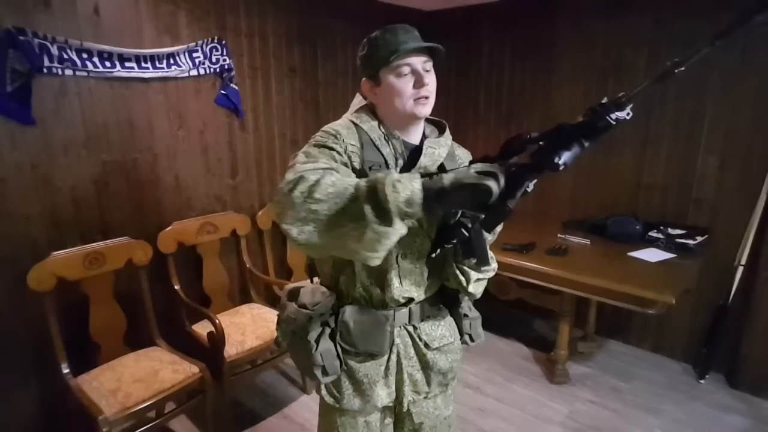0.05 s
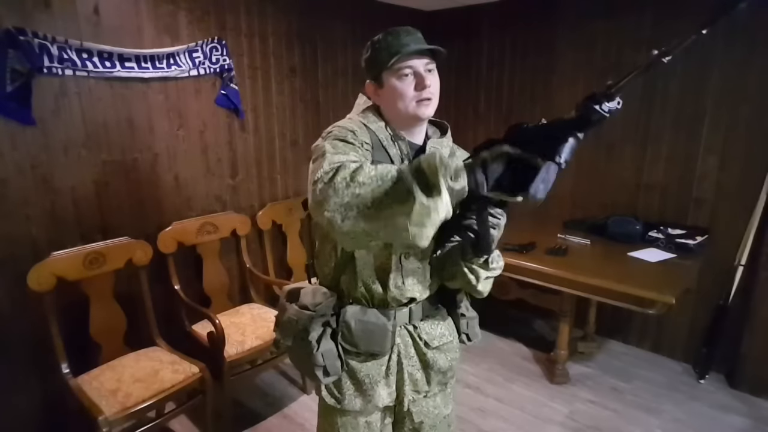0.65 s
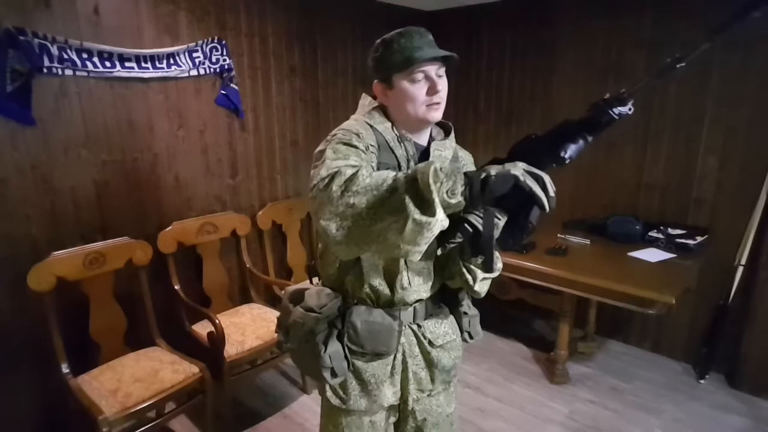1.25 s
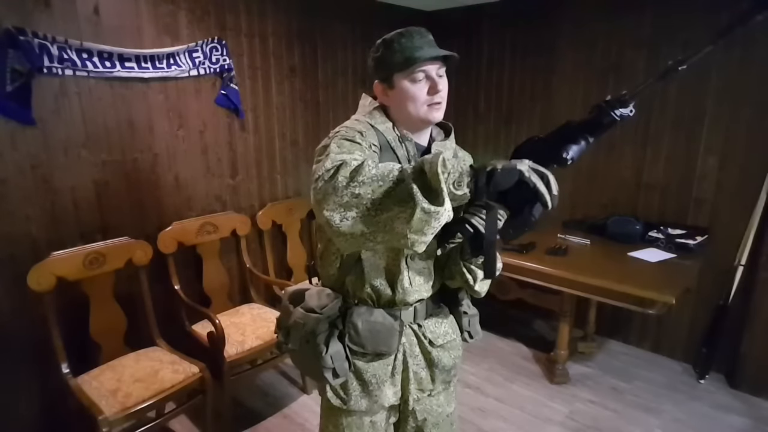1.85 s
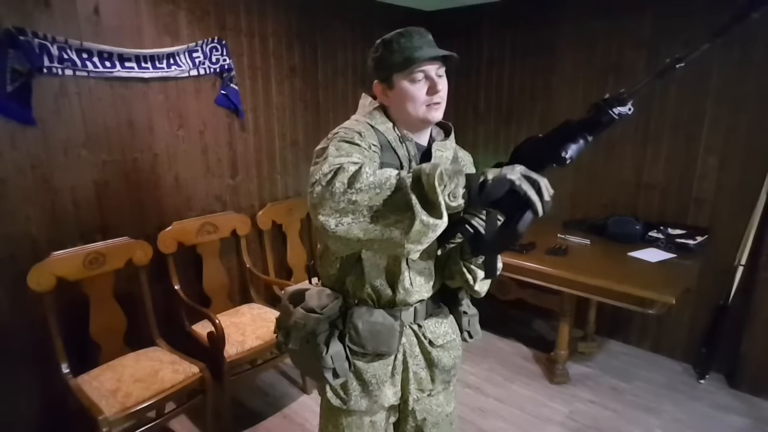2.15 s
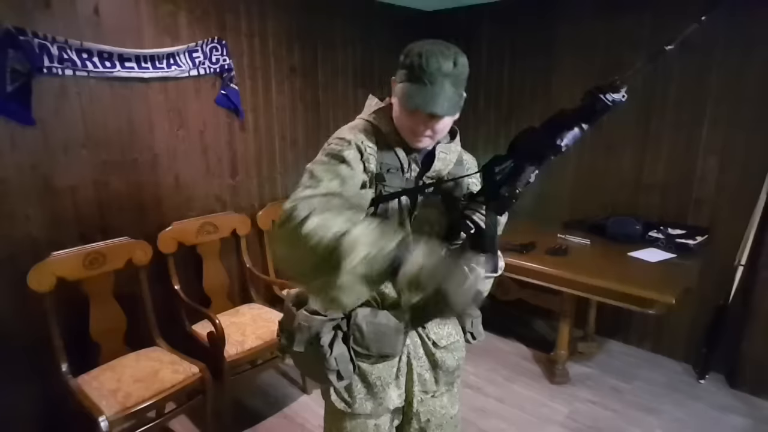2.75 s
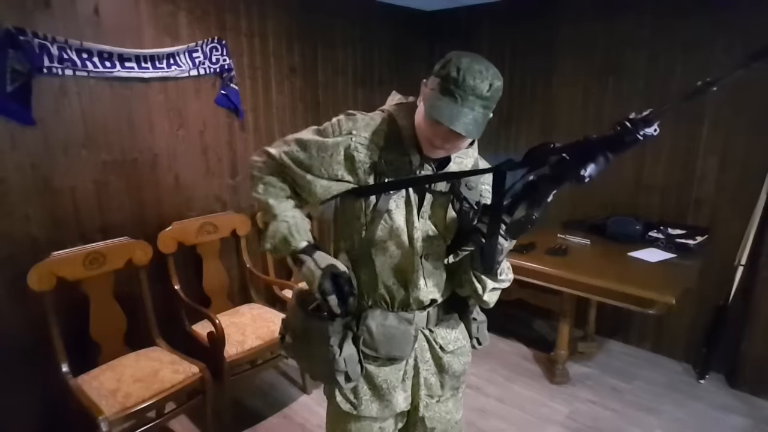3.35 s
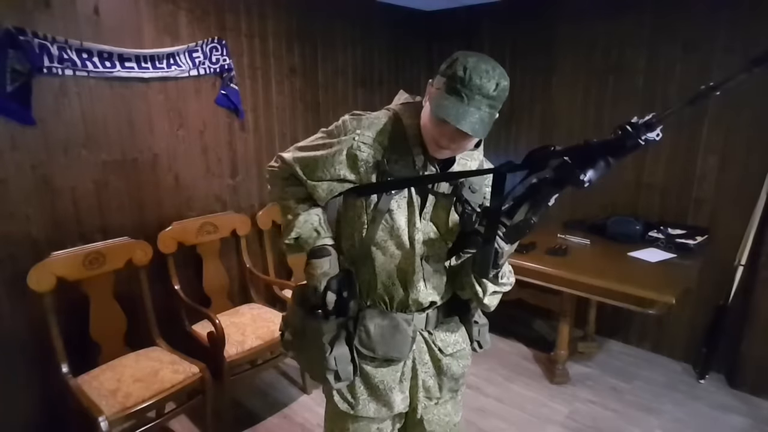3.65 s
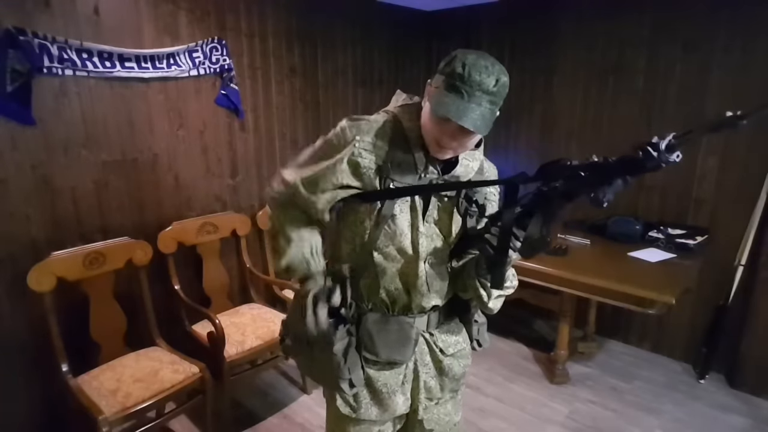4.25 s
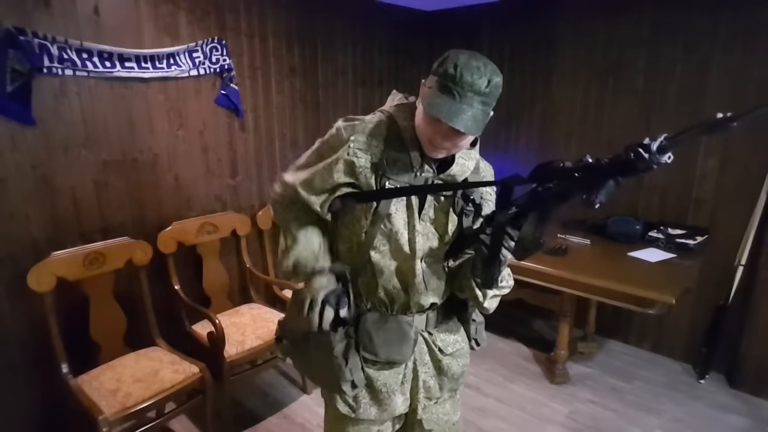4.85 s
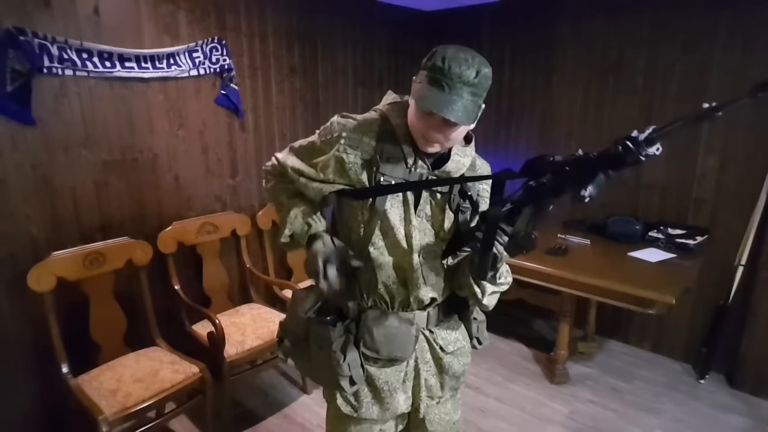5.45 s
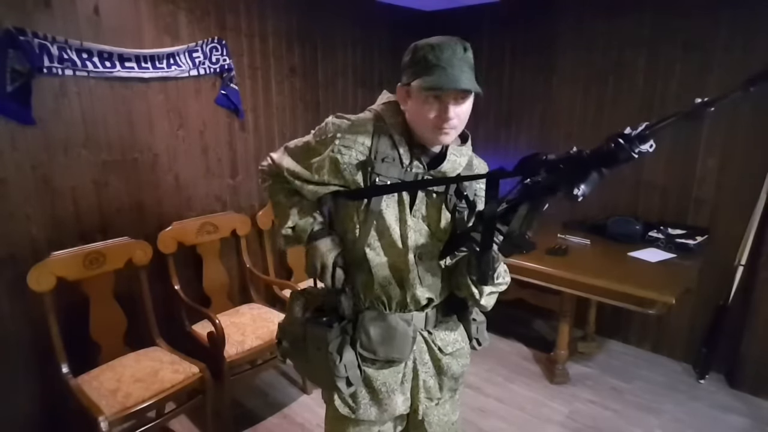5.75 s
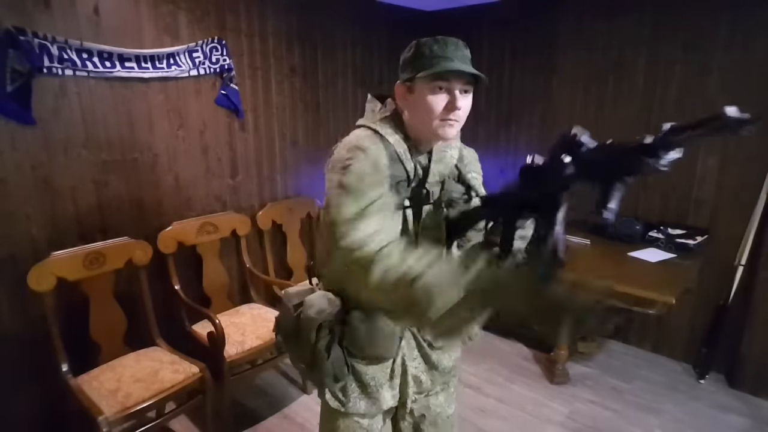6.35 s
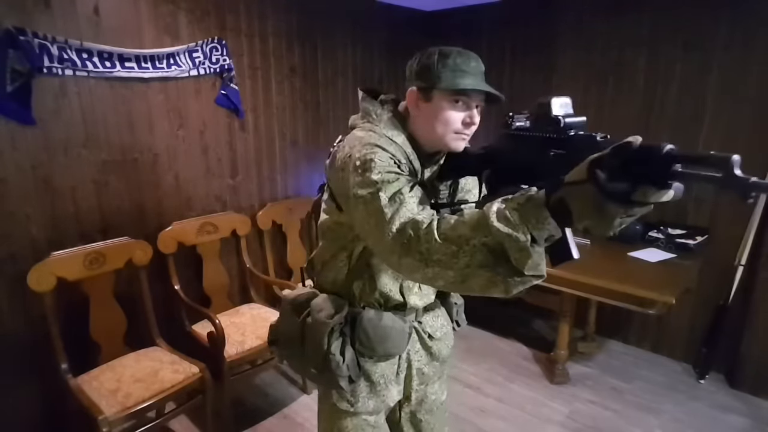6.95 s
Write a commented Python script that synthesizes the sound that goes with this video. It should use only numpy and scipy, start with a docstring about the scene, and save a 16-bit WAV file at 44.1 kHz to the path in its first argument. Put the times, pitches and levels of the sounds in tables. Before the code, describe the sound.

A rifle is handled in a small wood-panelled room, heard in stereo with short, lively reflections over faint air and a barely audible hum. Soft sleeve rustle and small steel clicks open, leading to a loud, hollow plastic magazine clack at about 0.75 seconds. Light taps follow. Sharp, briefly ringing steel snaps come at 1.9 and 2.4 seconds, with plastic knocks between them, then a quick clatter and a swish of cloth at 2.7. From about 3 to 5.8 seconds a gloved hand rummages in a fabric pouch: quieter, uneven rubbing and crinkling with dull, padded bumps, the strongest near 5 seconds with a soft low thud. A firm plastic knock lands at 6.2 seconds. The stock scrapes briefly up the jacket, rising into another clack at 6.5. A small click, a knock and a last rustle settle by about 6.8 seconds.

```python
"""A small, live, wood-panelled room, heard from two microphones 16 cm apart.
Someone in stiff field clothes handles a rifle: sleeves rub, steel catches snap and a hollow plastic
magazine knocks home. A gloved hand rummages in a fabric pouch, where the gear bumps dully; then the
stock scrapes up the jacket to the shoulder. Blows ring the parts they strike, fibres catch and slip,
and the walls send both back to the microphones over still air and a faint hum."""
import sys
import numpy as np
from scipy import signal
from scipy.fft import rfft, irfft, next_fast_len
from scipy.io import wavfile
from scipy.ndimage import map_coordinates

SR = 44100
rng = np.random.default_rng(int(sys.argv[2]) if len(sys.argv) > 2 else 0)


def store_wav(level_fs):
    """Save 16-bit WAV to argv[1]."""
    pcm = np.round(np.clip(np.atleast_2d(level_fs), -1, 1) * 32767)
    wavfile.write(sys.argv[1], SR, pcm.T.astype(np.int16))


N = 313501
TIME = np.arange(N) / SR


def amp(db):
    """Decibels to gain."""
    return 10 ** (np.asarray(db) / 20)


def unit(x):
    """Scaled to rms 1."""
    return x / np.sqrt(np.mean(x ** 2) + 1e-20)


def along(points, hz):
    """(Hz, value) points read on a log axis."""
    f, v = np.transpose(points)
    return np.interp(np.log(hz + 1), np.log(f + 1), v)


def spectrum(points):
    """(Hz, dB) points as a gain curve over frequency."""
    return lambda hz: amp(along(points, hz))


def resonance(modes, hz):
    """Power gain of a set of resonances."""
    return sum(amp(db) ** 2 / (1 + (2 * (hz - centre) / width) ** 2) for centre, width, db in modes)


def filtered(x, response):
    """x through a response of frequency."""
    n = x.shape[-1]
    m = next_fast_len(n + 8192)
    return irfft(rfft(x, m) * response(np.fft.rfftfreq(m, 1 / SR)), m)[..., :n]


def coloured(x, gain):
    """x through the causal filter that has this gain: it rings only after the blow."""
    m = 2 ** 14
    cepstrum = irfft(np.log(gain(np.fft.rfftfreq(m, 1 / SR)) + 1e-6))
    cepstrum[1:m // 2] *= 2
    cepstrum[m // 2 + 1:] = 0
    return signal.fftconvolve(x, irfft(np.exp(rfft(cepstrum))))[:len(x)]


def add(track, s, sound):
    """Mix a sound in at s seconds."""
    start = max(0, round(s * SR))
    part = track[..., start:start + sound.shape[-1]]
    part += sound[..., :part.shape[-1]]


def lean_right(pair, db):
    """The right microphone up by db, the left down by as much."""
    return pair * amp([[-db], [db]])


def diffuse(size, spacing_m=0.16):
    """Noise from all sides at the two microphones: alike in the bass only."""
    def mid_side_gains(hz):
        angle = np.arccos(0.9 * np.sinc(2 * hz * spacing_m / 343)) / 2
        return np.array([np.cos(angle), np.sin(angle)])
    mid, side = filtered(rng.standard_normal((2, size)), mid_side_gains)
    return np.array([mid + side, mid - side])


# How long the panelled room rings. Each row: frequency in Hz, seconds to fall 60 dB.
ROOM_T60 = [(150, 0.38), (400, 0.49), (1100, 0.89), (2700, 0.72), (7000, 0.63), (14000, 0.32)]
# Where the hands work. Each row: time in seconds, lead of the left microphone in ms.
HAND_POSITION = [(0, 0.13), (2.6, 0.12), (3.1, -0.04), (6.2, -0.02), (6.5, 0.096)]

def in_room(direct, radiated, s, early_db, tail_db, early_t60, build_s):
    """Direct sound reaches the nearer microphone first; what is radiated all round returns off walls."""
    t = np.arange(SR * 3 // 4) / SR
    hz, frame_s, bands = signal.stft(diffuse(len(t)), SR, nperseg=256)
    decay = amp(-60 * frame_s / along(ROOM_T60, hz)[:, None])
    tail = signal.istft(bands * decay, SR, nperseg=256)[1][:, :len(t)]
    early = diffuse(len(t)) * amp(-60 * t / early_t60)
    arriving = lambda echoes: unit(echoes * (1 - np.exp(-t / build_s))) / np.sqrt(len(t))
    walls = amp(early_db) * arriving(early) + amp(tail_db) * arriving(tail)
    pair = signal.fftconvolve(radiated[None], walls, axes=1)
    lead_s = np.interp(s, *np.transpose(HAND_POSITION)) / 1000
    add(pair, 0, filtered(direct, lambda hz: np.exp(1j * np.pi * hz * lead_s * np.array([[1], [-1]]))))
    return pair


def moving_in_room(sound):
    """The body moves, so each third of a second meets the room differently."""
    out, step = np.zeros((2, N)), SR // 3
    for start in range(0, N, step):
        piece, s = sound[start:start + step], start / SR
        add(out, s, in_room(piece, piece, s, early_db=3, tail_db=0, early_t60=0.099, build_s=0.0049))
    return lean_right(out, 0.99)


# The empty room, all round the microphones. Each row: frequency in Hz, relative density in dB.
AIR_SPECTRUM = [(25, -28), (48, -8), (64, -2), (112, -4), (180, -8.5), (320, -4), (700, -5), (2000, -11),
                (4000, -16), (9000, -26), (16000, -21.5)]

def room_tone():
    """Still air from all sides and a faint low hum, alike at both microphones."""
    air = unit(filtered(diffuse(N), spectrum(AIR_SPECTRUM)))
    hum = np.sin(2 * np.pi * 49 * TIME)
    return amp(-64.5) * air + amp(-76) * hum


def friction(gain, slips_per_s, spread_db, hiss):
    """Fibres catch and slip: grains of uneven size over a smooth hiss; rms 1."""
    slipping = rng.random(N) < slips_per_s / SR
    sizes = amp(spread_db * np.minimum(rng.exponential(size=N), 3.5))
    pressure = signal.lfilter([1], [1, -np.exp(-1 / (0.0024 * SR))], slipping * sizes)
    return unit(coloured(rng.standard_normal(N) * (unit(pressure) + hiss), gain))


def stroke(start, length, attack_s=0.034, release_s=0.034):
    """One movement: cloth takes up the motion, holds it, then settles."""
    rise = np.clip(1 + (TIME - start) / attack_s, 0, 1)
    return rise * np.exp(-np.clip((TIME - start - length) / release_s, 0, 20))


def fumble(depth_db=2.5, per_s=14):
    """The hand never moves evenly: a smooth random gain for its hesitations."""
    wobble = map_coordinates(rng.standard_normal(512), [TIME * per_s], mode="wrap")
    return unit(amp(depth_db * wobble))


# Stiff cloth's low, middle and high voices. Each row: frequency in Hz, relative density in dB.
FLAP_SPECTRUM = [(100, -6.5), (200, -12.5), (320, -1.5), (600, -0.5), (900, -7), (1800, -42.5)]
RUB_SPECTRUM = [(350, -30), (750, -5), (1300, -1), (2300, -2.5), (3200, -6.5), (6000, -23)]
CRINKLE_SPECTRUM = [(1600, -45), (3200, -2.5), (5000, -5), (7800, -4), (9500, -11), (12000, -8),
                    (16000, -9)]
# Sleeve and glove moves. Each row: start in seconds, length in seconds, effort in dB, crispness in dB.
CLOTH_STROKES = [(0.0, 0.052, -63, -10), (0.2, 0.076, -69.5, -1), (0.377, 0.64, -58, -13),
                 (1.147, 0.3, -76, -16), (2.637, .07, -49.5, -25), (2.719, 0.056, -46, -6),
                 (3.178, 2.02, -62, -5.5), (3.236, 0.078, -58.5, -4.5), (3.629, 0.075, -53.5, -1),
                 (3.747, 0.098, -59, -3.5), (3.909, 0.066, -54, -2.5), (4.293, 0.049, -50.5, 3.5),
                 (4.672, 0.21, -55, -4), (4.876, 0.13, -47.5, -12), (5.283, 0.12, -61.5, -1.5),
                 (5.608, 0.19, -61.5, -3), (5.895, 0.2, -60, -3), (6.114, 0.13, -49.5, -5),
                 (6.386, 0.24, -56.5, -1.5), (6.676, 0.074, -43, -15)]

def cloth():
    """Sleeves, glove and pouch flap, rub and crinkle with the effort of each stroke."""
    flap = friction(spectrum(FLAP_SPECTRUM), slips_per_s=300, spread_db=-1.5, hiss=0.32)
    rub = friction(spectrum(RUB_SPECTRUM), slips_per_s=400, spread_db=5, hiss=0.32)
    crinkle = friction(spectrum(CRINKLE_SPECTRUM), slips_per_s=230, spread_db=8, hiss=0.55)
    mean_db = np.mean([db for _, _, db, _ in CLOTH_STROKES])
    power = np.zeros((3, N))
    for start, length, db, crisp_db in CLOTH_STROKES:
        flap_db = mean_db - 7 + 0.9 * (db - mean_db)  # grows a little less than the rubbing
        power += np.outer(amp([flap_db, db, db + crisp_db]) ** 2, stroke(start, length) ** 2)
    return np.sum(np.sqrt(power) * [flap, rub, crinkle], axis=0) * fumble()


def tone(weight_db, hardness_db, body_db, body_share, edge_db, edge_share):
    """Band levels in dB: more mass behind a blow gives thud and body, barer parts give edge and tick."""
    return weight_db, body_db + body_share * weight_db, edge_db + edge_share * hardness_db, hardness_db


def contact(bands_db, rattle_t60, modes, bass_db, rise_s, strike):
    """One blow and its quick chatter ring a part. Returns the rattling sound and the bare ring."""
    thud, body, edge, tick = bands_db
    t = np.arange(SR // 5) / SR
    blow = signal.unit_impulse(len(t))
    chatter = rng.laplace(size=len(t)) * amp(-60 * t / max(rattle_t60, 0.004))
    chatter *= 1 - np.exp(-t / rise_s)
    force = chatter / np.linalg.norm(chatter) + strike * np.roll(blow, round(rise_s * SR))
    bass = thud + bass_db
    colour = [(40, bass - 22), (110, bass), (195, bass), (310, thud + 3), (500, thud + 3.86),
              (720, body + 0.79), (1100, body + 2), (1500, -2.36), (2400, -3.37),
              (3400, edge - 3), (6000, edge - 6.5), (9200, tick - 9), (14000, tick - 7)]
    blow_samples = SR * 0.02  # a contact's level is its energy spread over 20 ms
    gain = lambda hz: amp(along(colour, hz)) * np.sqrt(blow_samples * (1 + resonance(modes, hz)))
    return coloured(force / np.linalg.norm(force), gain), coloured(blow, gain)


# The steel's resonances. Each row: pitch in Hz, width in Hz, level in dB over the plain contact.
STEEL_MODES = [(1038, 84, 7), (1246, 45, 6), (1450, 90, -21.5), (1730, 70, -16), (2220, 82, 2),
               (3940, 150, -5.5), (4180, 170, 3.5), (7940, 490, 4), (10700, 190, 6.5), (12360, 600, 6.5)]
# Catches and levers. Each row: start in seconds, level, weight and hardness in dB, main ring in Hz.
CATCH_SNAPS = [(0.1024, -41.5, -14.5, -4.5, 2500), (0.3627, -31, -30, -15.5, 1760),
               (0.4405, -35, -13.5, -6, 1760), (0.5308, -40.5, -33, -2.5, 1740),
               (0.6751, -29, -23, 0, 3920), (1.9184, -18, -16.5, -2.5, 1085),
               (2.2142, -36, -15.5, -16.5, 2030), (2.4168, -16.5, -30, -6, 3980),
               (6.6439, -31.5, -29, -1.5, 1060)]

def catch_snaps():
    """Sprung steel parts snap over, each with a ring of its own; light ones stay short and dry."""
    out = np.zeros((2, N))
    strongest_db = max(row[1] for row in CATCH_SNAPS)
    for s, db, weight, hardness, ring_hz in CATCH_SNAPS:
        modes = STEEL_MODES + [(ring_hz, 0.061 * ring_hz, 10)]
        shaken = amp(0.2 * (db - strongest_db))  # a stronger snap shakes more of the rifle
        bands = tone(weight, hardness, body_db=9.5, body_share=1, edge_db=0.85, edge_share=0.38)
        direct, ring = contact(bands, rattle_t60=0.042 * shaken, modes=modes,
                               bass_db=-5.5, rise_s=0.00067, strike=0.36)
        pair = in_room(direct, ring * shaken, s, early_db=2, tail_db=2, early_t60=0.22, build_s=0.0024)
        add(out, s, amp(db) * pair)
    return lean_right(out, 0.93)


# The magazine's resonances. Each row: pitch in Hz, width in Hz, level in dB over the plain contact.
MAGAZINE_MODES = [(328, 8.4, 10.5), (477, 116, 5.5), (638, 71, 6.5), (887.4, 25.6, 10), (1170, 25, 2.5),
                  (1330, 34, -1), (1730, 150, 1.5), (2540, 98, -26)]
# Plastic knocks. Each row: start in seconds, level, weight and hardness in dB, main ring in Hz.
MAGAZINE_KNOCKS = [(0.583, -36.5, -24, -10.5, 1410), (0.7283, -22.5, -14.5, -21, 875),
                   (0.7558, -13, -15, -13.5, 633), (1.1487, -47, -0.5, -14, 265),
                   (1.2231, -44.5, 0, -15, 310), (1.3502, -38.5, -12, -27, 786),
                   (1.6195, -53.5, -18, -23, 1880), (1.7167, -52.5, -22, -23.5, 1880),
                   (1.7694, -47.5, 3, -10.5, 314), (2.0718, -29.5, -6, -22, 1067),
                   (2.3124, -26.5, -14.5, -15.5, 925), (2.7012, -30, -12, -18, 1598),
                   (2.7118, -22.5, -22.5, -25.5, 930), (2.728, -25.5, -30, -20.5, 1334),
                   (2.7616, -30.5, -34, -7.5, 1683), (6.1329, -29.5, 0, -21.5, 322),
                   (6.1895, -16, -7.5, -20, 650), (6.5238, -17.5, -17, -20, 1063),
                   (6.6706, -25, -23.5, -21, 2355)]

def magazine_knocks():
    """The hollow magazine knocks on the rifle's plastic; the struck spot picks the strongest ring."""
    out = np.zeros((2, N))
    for s, db, weight, hardness, ring_hz in MAGAZINE_KNOCKS:
        modes = MAGAZINE_MODES + [(ring_hz, 0.046 * ring_hz, 13.5)]
        bands = tone(weight, hardness, body_db=-1.5, body_share=0.31, edge_db=-4.5, edge_share=0.33)
        direct, ring = contact(bands, rattle_t60=0.063, modes=modes,
                               bass_db=-10, rise_s=0.0021, strike=0.68)
        pair = in_room(direct, ring, s, early_db=1.5, tail_db=-1, early_t60=0.12, build_s=0.0016)
        add(out, s, amp(db) * pair)
    return lean_right(out, 0.15)


# A push of air at the microphones. Each row: frequency in Hz, relative density in dB.
HEAVE_SPECTRUM = [(30, -52), (70, -6), (120, 3.5), (190, -21), (400, -30)]
# The loaded pouch and jacket sagging. Each row: peak time in seconds, level in dB.
FABRIC_HEAVES = [(0.76, -57), (2.31, -57.5), (2.73, -79), (3.335, -64), (4.35, -56), (4.93, -52.5),
                 (4.969, -46), (6.16, -55), (6.73, -77)]

def fabric_heaves(half_length_s=0.032):
    """Soft low pushes of air as heavy fabric shifts."""
    swell = sum(amp(db) * np.exp(-((TIME - s) / half_length_s) ** 2) for s, db in FABRIC_HEAVES)
    return swell * unit(filtered(diffuse(N), spectrum(HEAVE_SPECTRUM)))


# Gear bumping under fabric. Each row: start in seconds, level, weight and hardness in dB.
POUCH_BUMPS = [(2.6343, -50, 1, -22), (3.1336, -46.5, -0.5, -15.5), (3.2128, -46.5, 1.5, -11),
               (3.3379, -43, -1, -18), (3.414, -45, -3, -14), (3.5158, -46.5, -8, -9),
               (3.8373, -37, -14, -20), (3.9245, -39.5, 0.5, -3), (3.9859, -40.5, -2.5, -15),
               (4.0856, -43.5, -4.5, -4), (4.1276, -35.5, -29, -37), (4.3065, -32.5, -14.5, -4.5),
               (4.3248, -38.5, -10.5, 6), (4.5412, -38, -3, -10.5), (4.7231, -37, -8.5, -24),
               (4.9035, -36.5, 6, -10), (4.9198, -36, -6.5, -17), (4.9593, -26.5, -2.5, -12.5),
               (5.043, -34, -5, -6.5), (5.337, -39.5, -20, -22), (5.4082, -41, -37, -18),
               (5.7704, -41, -16, -15), (6.0638, -46, 3, -27), (6.705, -40.5, -2, -14)]

def pouch_bumps():
    """Fabric pads the magazine's knocks in the pouch and damps its ring."""
    out = np.zeros((2, N))
    padded = [(hz, width * 2.44, db - 1.5) for hz, width, db in MAGAZINE_MODES]
    for s, db, weight, hardness in POUCH_BUMPS:
        bands = tone(weight, hardness, body_db=0.5, body_share=0.95, edge_db=2, edge_share=0.61)
        direct, ring = contact(bands, rattle_t60=0.057, modes=padded,
                               bass_db=-5, rise_s=0.0052, strike=0.52)
        pair = in_room(direct, ring, s, early_db=1.5, tail_db=-1.5, early_t60=0.17, build_s=0.004)
        add(out, s, amp(db) * pair)
    return lean_right(out, 0.78)


# The scraping stock's resonances at mid-drag. Each row: pitch in Hz, width in Hz, relative level in dB.
STOCK_MODES = [(994, 25, 6.5), (1138, 54, 5), (1600, 360, -11), (2460, 150, -11), (2900, 260, -11)]

def stock_drag(start_s=6.41, length_s=0.11, swell_db_per_s=72, octaves_per_s=1.1):
    """The stock drags up the jacket, ever harder and higher in pitch."""
    gain = lambda hz: np.sqrt(resonance(STOCK_MODES, hz)) * hz ** 3 / (hz ** 3 + 600 ** 3)
    scrape = friction(gain, slips_per_s=460, spread_db=11, hiss=0.46)
    dragged_s = np.clip(TIME - start_s, 0, length_s)
    speed = 2 ** (octaves_per_s * (dragged_s - length_s / 2))
    rising = map_coordinates(scrape, [np.cumsum(speed)], mode="wrap")
    return rising * amp(-42 + swell_db_per_s * dragged_s) * stroke(start_s, length_s)


def scene():
    """The handling and the room as they reach the two microphones."""
    contacts = magazine_knocks() + catch_snaps() + pouch_bumps()
    rustle = moving_in_room(cloth() + stock_drag())
    return contacts + rustle + fabric_heaves() + room_tone()


def record(dry):
    """The recorder sheds the deepest bass and keeps nothing above its band limit."""
    low_cut_hz, top_hz = 38, 16100
    return filtered(dry, lambda hz: (hz < top_hz) * (1 - 1 / (1 + (hz / low_cut_hz) ** 4)))


dry = scene()
out = record(dry)
store_wav(out)
```